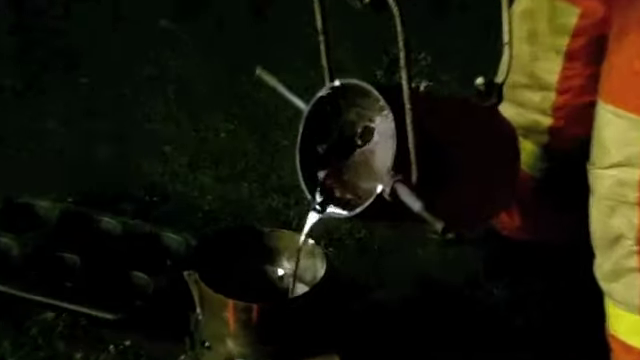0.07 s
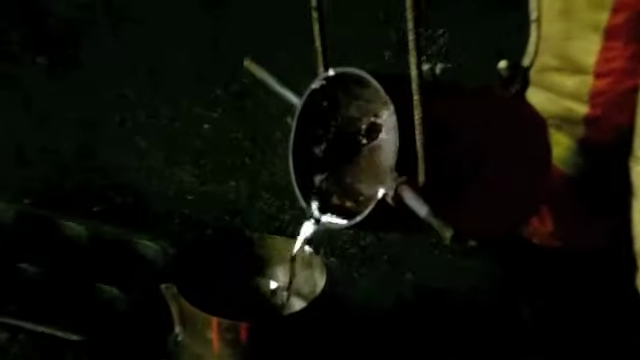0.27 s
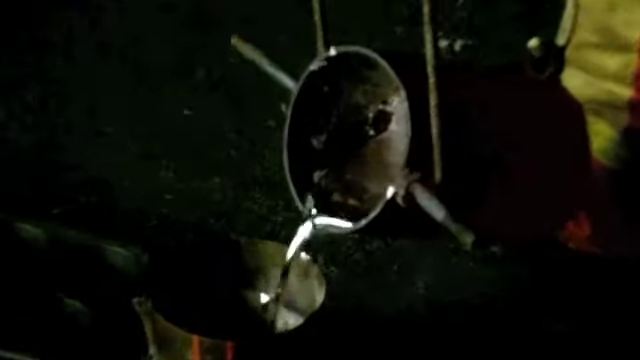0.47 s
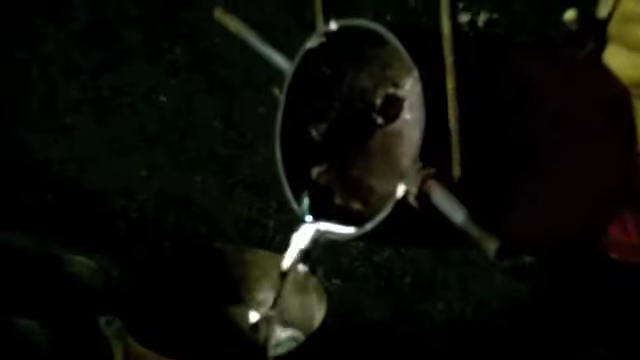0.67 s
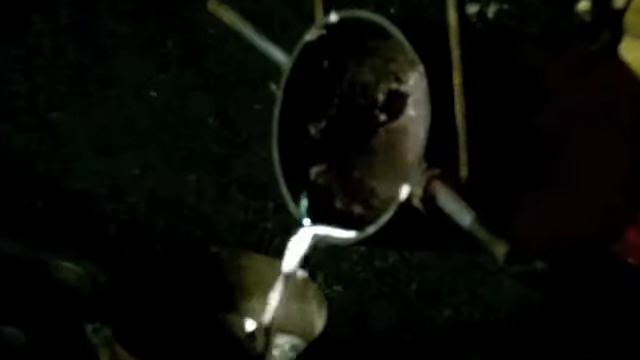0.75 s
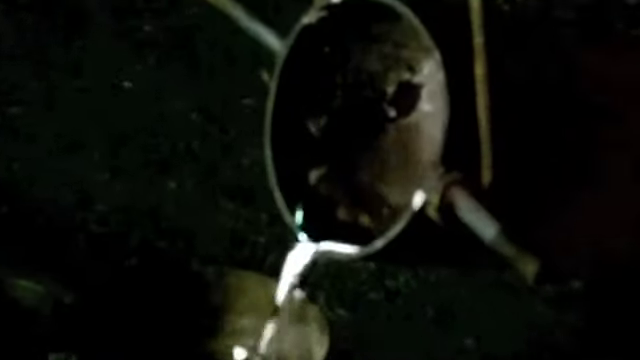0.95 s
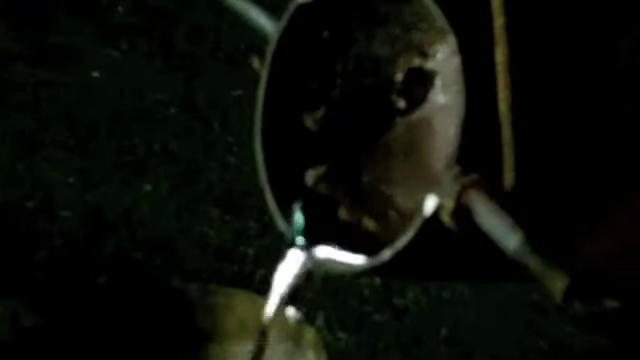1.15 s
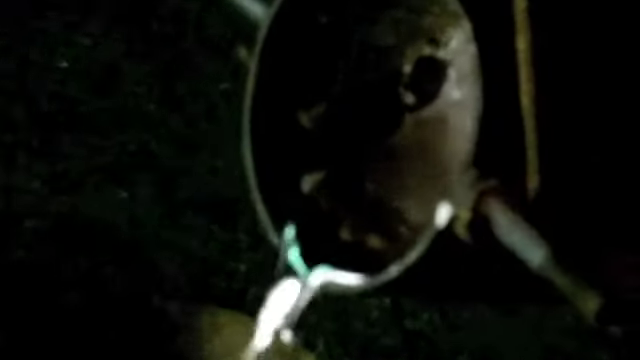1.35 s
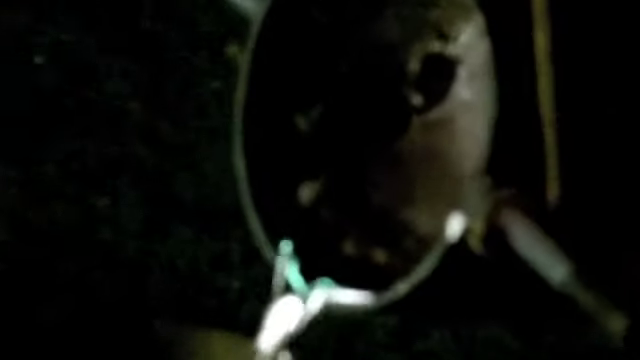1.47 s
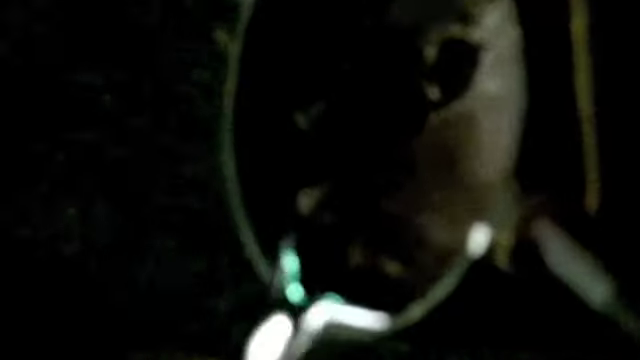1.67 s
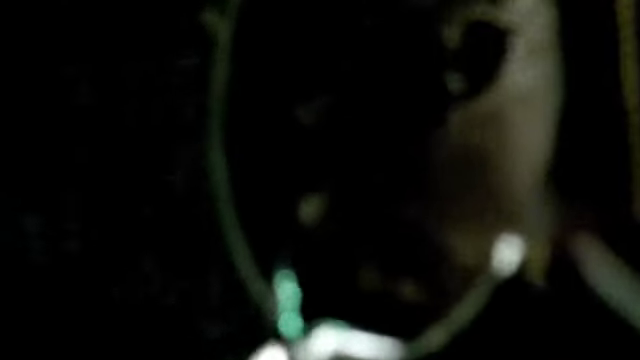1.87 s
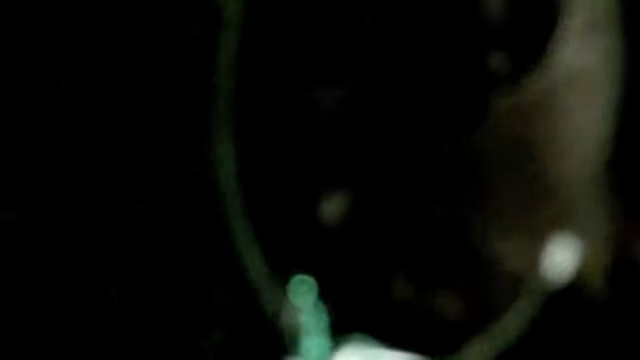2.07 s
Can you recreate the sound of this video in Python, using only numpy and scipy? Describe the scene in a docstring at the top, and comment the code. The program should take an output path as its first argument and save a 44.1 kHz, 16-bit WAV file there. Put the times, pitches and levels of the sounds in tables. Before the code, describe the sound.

Molten metal pours into a steel mould with a soft, steady hiss and sizzle for about two seconds. At about 0.2 seconds the steel gear clanks twice very quickly, bright and much louder, ringing briefly. Sharp spark crackles and dull spatters cluster from 0.4 to 0.7 seconds, then come fainter and sparser. Tiny plops and a faint, distant machinery hum lie underneath, outdoors with a short echo.

```python
"""Molten metal pours from a crucible into a steel mould, outdoors: a steady noise hiss with fine sizzle,
small plops in the pool, sharp spark crackles and a few dull spatters of melt. Early on, the steel
pouring gear shifts and clanks twice, a bright chatter over ringing modes. The yard gives clanks,
spatters and crackles a short tail, and machinery hums far off. One microphone with a quick limiter."""
import sys
import numpy as np
from scipy import signal
from scipy.fft import rfft, irfft
from scipy.io import wavfile
from scipy.ndimage import uniform_filter1d

SR = 44100
rng = np.random.default_rng(int(sys.argv[2]) if len(sys.argv) > 2 else 0)


def generate_wav(sig):
    """Save sig (samples, or channels by samples) to the path in sys.argv[1] as 16-bit PCM at SR."""
    pcm = np.round(np.clip(np.atleast_2d(sig).T, -1, 1) * 32767).astype(np.int16)
    wavfile.write(sys.argv[1], SR, pcm)


N = 92610

# Distant machinery. Each row: centre in Hz, width in Hz, level in dB.
HUM_BANDS = [(131.2, 5.1, -78), (206, 16, -74.5)]
# The yard's tail. Each row: frequency in Hz, t60 in seconds.
YARD_DECAY = [(400, 0.31), (1000, 0.3), (4000, 0.66), (9000, 0.36)]
# Blows of the pouring gear. Each row: start in seconds, chatter level in dB, low-pass in Hz,
# chatter attack and t60 in seconds, ring gain in dB, chatter tilt in dB per octave.
STEEL_BLOWS = [(.19, -34, 2600, 0.016, 0.13, -45, -1.5), (.2158, -18.5, 2500, 0.0042, 0.026, -25, .5),
               (.2386, -15, 5500, .0022, 0.034, -30, 1.6), (.271, -35.5, 2800, 0.006, 0.073, -67, -0.5)]
# Tone of steel striking steel. Each row: frequency in Hz, relative level in dB.
CHATTER_EQ = [(40, -32), (250, -15.5), (400, -12.5), (620, 1.5), (780, -9), (960, 2.5), (1280, -10.5),
              (1830, -2), (2200, -2.5), (2900, -2.5), (3300, -4.5), (3900, 4), (4230, 2.5), (4400, -2),
              (4650, 10), (5000, -6), (6000, -8.5), (6900, -0.5), (7500, -19), (10000, -14)]
# Ringing modes of the gear. Each row: pitch in Hz, relative level in dB, t60 in seconds.
STEEL_MODES = [(400, -7, .1), (430, 0, .11), (435, -11.5, .42), (643, -17, .17), (931, -13, .2),
               (983, -15, .16), (1826, -12, .17), (1939, -15, .16), (2448, -14, .2), (3497, -14, .22),
               (3722, -14, .22), (3956, -13, .22), (4243, -12, .2), (4648, -12, .27), (4693, -11, .25)]
# Blobs of melt landing. Each row: start in seconds, level in dB, low-pass in Hz.
MELT_SPATTERS = [(.434, -42, 1400), (.4995, -35, 1600), (.551, -50, 1300), (.665, -43.5, 796),
                 (.681, -47, 1800), (1.262, -50, 1910), (1.367, -48, 1000), (1.518, -40, 2300),
                 (1.596, -45, 1900), (2.021, -52, 1600)]
# Bursting sparks. Each row: start in seconds, peak in dB, t60 in seconds, low cut in Hz.
SPARK_CRACKLES = [(.4385, -30, .002, 2500), (.4985, -26, .003, 1800), (.545, -31, .002, 2500),
                  (.6325, -25, .003, 1500), (.6868, -31, .018, 6000), (.6885, -33, .012, 5500),
                  (.7052, -27, .004, 1300), (.7065, -31, .004, 3500), (1.094, -34, .002, 2500),
                  (1.479, -37, .008, 4000), (1.951, -36, .004, 1500)]
# Tone of the hiss. Each row: frequency in Hz, relative level in dB.
HISS_EQ = [(20, -21), (70, -29.5), (110, -13.5), (140, -11.5), (175, -7), (210, -8.5), (280, -8.5),
           (420, -3.5), (950, -2.5), (1150, -4), (1550, -3), (1850, -7.5), (2200, -9.5), (2400, -4.5),
           (2620, -7.5), (2900, -1), (3220, 0.5), (3450, -3), (3850, -4), (4150, -3), (4750, 1.5),
           (5050, -3.5), (5700, -1.5), (6200, -4), (6600, 0), (7250, -1.5), (7700, -5), (8200, -2),
           (8900, -5.5), (9700, -1), (10500, -13)]
# Fader ride of the hiss. Each row: time in seconds, level in dB, treble shelf in dB.
POUR_RIDE = [(0, -45, 1), (.2, -43, -0.5), (.42, -43, 0.5), (.56, -44.5, -1.5), (.75, -44, -3),
             (.98, -44.5, -3.5), (1.16, -45, 0), (1.33, -45.5, -4), (1.5, -45, -1), (1.75, -46, -3.5),
             (2.1, -45.5, -2.5)]

BANDWIDTH_HZ = 10120


def amp(db):
    """Decibels to gain."""
    return 10 ** (np.asarray(db) / 20)


def unit(x):
    """Scales to rms 1."""
    return x / np.sqrt(np.mean(x ** 2) + 1e-20)


def curve_at(points, hz):
    """Reads a curve on a log-frequency axis."""
    point_hz, value = np.transpose(points)
    return np.interp(np.log(hz + 1), np.log(point_hz + 1), value)


def add(mix, start_s, sound):
    """Drops a sound into the mix."""
    part = mix[round(start_s * SR):][:len(sound)]
    part += sound[:len(part)]


def colour(x, gain):
    """EQs by a gain given as a function of frequency; rms 1."""
    hz = np.fft.rfftfreq(len(x), 1 / SR)
    return unit(irfft(rfft(x) * gain(hz), len(x)))


def lowpass(hz, top_hz, order=2):
    """Gain of a smooth treble roll-off."""
    return 1 / np.sqrt(1 + (hz / top_hz) ** (2 * order))


def strike(t, attack_s, t60):
    """Percussive envelope: linear attack, exponential decay."""
    return np.minimum(t / attack_s, 1) * np.exp(-np.log(1000) * np.maximum(t - attack_s, 0) / t60)


def clicks(per_s, spread_db):
    """Random clicks, most small, a few large."""
    size = amp(spread_db * np.minimum(rng.exponential(1, N), 4))
    return size * rng.choice([-1, 1], N) * (rng.random(N) < per_s / SR)


def machinery_hum():
    """Distant machinery lays a faint bed: noise bands so narrow they sound like wavering tones."""
    return sum(amp(db) * colour(rng.standard_normal(N), lambda hz: lowpass(abs(hz - centre), width / 2))
               for centre, width, db in HUM_BANDS)


def yard_reverb(send, fade_in_s=0.0041):
    """The yard scatters echoes, each band dying at its own speed."""
    hz, t, spectrum = signal.stft(rng.standard_normal(SR // 2), SR, nperseg=256)
    decay = np.exp(-np.log(1000) * t / curve_at(YARD_DECAY, hz)[:, None])
    tail = signal.istft(spectrum * decay, SR)[1]
    tail *= np.minimum(np.arange(len(tail)) / SR / fade_in_s, 1) ** 2
    return signal.fftconvolve(send, tail / np.linalg.norm(tail))[:N]


def steel_clank(chatter_db, top_hz, attack_s, t60, ring_db, tilt_db, low_cut_hz=263, attack_cycles=2.5):
    """Steel chatters on steel and rings briefly; the low modes bloom more slowly."""
    t = np.arange(SR // 2) / SR
    chatter = colour(rng.choice([-1., 1.], len(t)), lambda hz: (
        amp(curve_at(CHATTER_EQ, hz) + tilt_db * np.log2(hz + low_cut_hz)) * lowpass(hz, top_hz)))
    ring = np.zeros(len(t))
    for hz, db, mode_t60 in STEEL_MODES:
        envelope = strike(t, attack_cycles / hz, mode_t60)
        ring += amp(db) * lowpass(hz, top_hz) * envelope * np.sin(2 * np.pi * hz * t)
    clank = amp(chatter_db) * chatter * strike(t, attack_s, t60) + amp(ring_db) * ring
    return signal.sosfilt(signal.butter(2, low_cut_hz, "high", fs=SR, output="sos"), clank)


def melt_spatter(db, top_hz, low_cut_hz=240):
    """A blob of melt lands with a dull puff."""
    t = np.arange(SR // 10) / SR
    noise = rng.standard_normal(len(t))
    puff = colour(noise, lambda hz: lowpass(hz, top_hz, order=3) * (1 - lowpass(hz, low_cut_hz) ** 2))
    return amp(db) * puff * strike(t, attack_s=0.001, t60=0.034)


def spark_crackle(peak_db, t60, low_cut_hz):
    """A spark bursts with a thin snap."""
    t = np.arange(SR // 20) / SR
    burst = rng.standard_normal(len(t)) * strike(t, 1 / SR, t60)
    band = signal.butter(2, [low_cut_hz, BANDWIDTH_HZ], "band", fs=SR, output="sos")
    snap = signal.sosfilt(band, burst)
    return amp(peak_db) * snap / abs(snap).max()


def pool_bubbles(level_db=-64, per_s=140, pitches=20, cycles=8.3):
    """Small, quickly damped plops where the stream meets the pool."""
    t = np.arange(SR // 20) / SR
    plops = np.zeros(N)
    for hz in np.geomspace(517, 1614, pitches):
        age = np.pi * hz * t / cycles
        plop = age * np.exp(-age) * np.sin(2 * np.pi * hz * t)
        plops += signal.oaconvolve(clicks(per_s / pitches, spread_db=3), plop)[:N]
    return amp(level_db) * unit(plops)


def pour_hiss(sizzle_db=-7.5, shelf_hz=5670, patch_db=1.5, flicker_db=0.8):
    """The running melt hisses and sizzles: noise and fine clicks share one EQ and follow the pour."""
    source = rng.standard_normal(N) + amp(sizzle_db) * unit(clicks(per_s=1000, spread_db=4))
    frames = dict(nperseg=1024, noverlap=896)
    hz, t, spectrum = signal.stft(source, SR, **frames)
    # Patches swell and fade in narrow bands; flicker moves all bands together.
    patches = uniform_filter1d(rng.standard_normal(spectrum.shape), size=5, axis=0)
    patches = unit(uniform_filter1d(patches, size=18, axis=1))
    flicker = unit(uniform_filter1d(rng.standard_normal(len(t)), size=6))
    tone = unit(amp(curve_at(HISS_EQ, hz)) * (hz < BANDWIDTH_HZ))[:, None]
    shelf = 1 - lowpass(hz, shelf_hz, order=3)[:, None] ** 2
    times, level_db, treble_db = np.transpose(POUR_RIDE)
    ride_db = np.interp(t, times, level_db) + shelf * np.interp(t, times, treble_db)
    gain = amp(ride_db + patch_db * patches + flicker_db * flicker)
    return signal.istft(spectrum * tone * gain, SR, **frames)[1][:N]


def scene():
    """One-shots with a reverb send sit on the dry pour and hum, the same in both channels."""
    hits = np.zeros(N)
    layers = (STEEL_BLOWS, steel_clank), (MELT_SPATTERS, melt_spatter), (SPARK_CRACKLES, spark_crackle)
    for cues, source in layers:
        for start_s, *settings in cues:
            add(hits, start_s, source(*settings))
    mono = hits + amp(-12.5) * yard_reverb(hits) + pour_hiss() + pool_bubbles() + machinery_hum()
    return np.array([mono, mono])


def record(dry):
    """A quick limiter ducks the whole mix on the clanks; a steep low-pass trims the top."""
    threshold_db, reduction_share, release_db_per_s = -26, 0.28, 350
    power_db = 10 * np.log10(abs(uniform_filter1d(dry[0] ** 2, size=130)) + 1e-12)
    release_db = np.arange(N) / SR * release_db_per_s
    held_db = np.maximum.accumulate(power_db + release_db) - release_db
    over_db = np.maximum(held_db - threshold_db, 0)
    ducked = dry / amp(reduction_share * uniform_filter1d(over_db, size=100))
    high_cut = signal.firwin(701, BANDWIDTH_HZ, window=("kaiser", 9), fs=SR)
    return signal.oaconvolve(ducked, high_cut[None], "same")


dry = scene()
out = record(dry)
generate_wav(out)
```